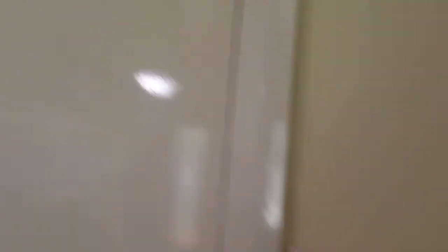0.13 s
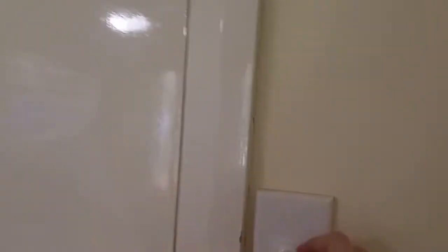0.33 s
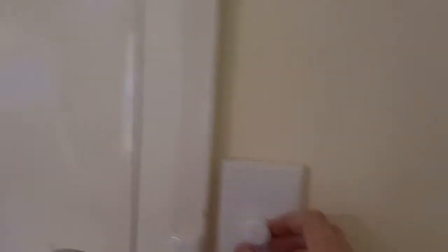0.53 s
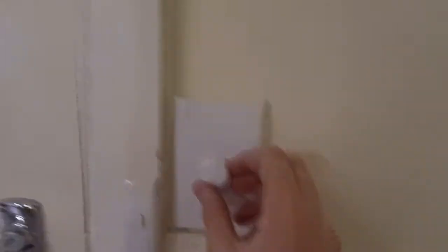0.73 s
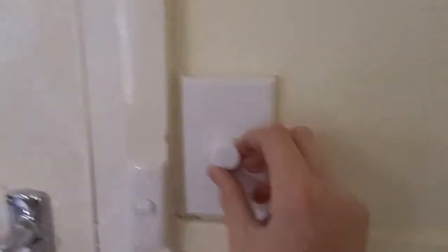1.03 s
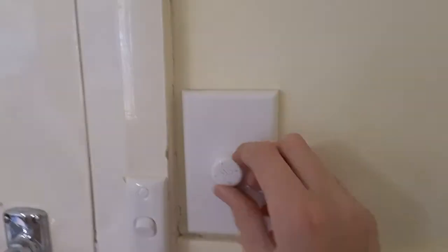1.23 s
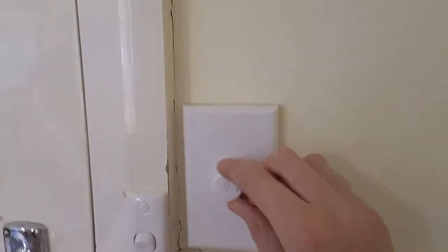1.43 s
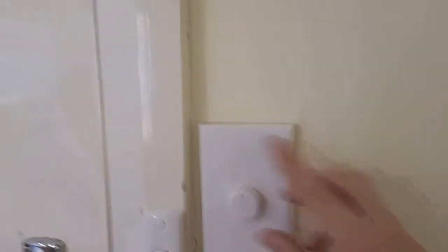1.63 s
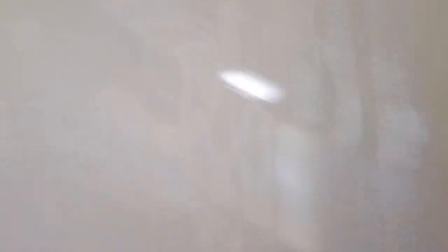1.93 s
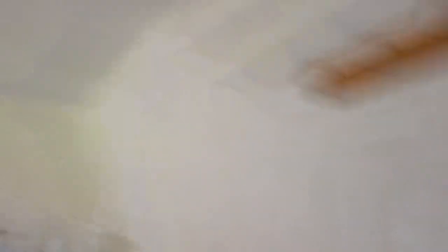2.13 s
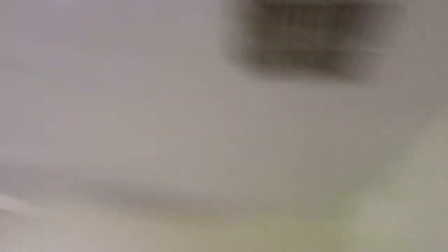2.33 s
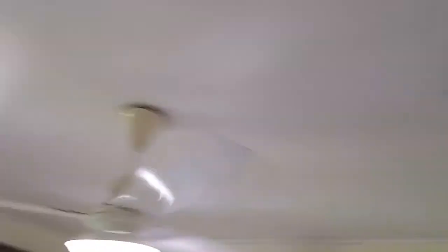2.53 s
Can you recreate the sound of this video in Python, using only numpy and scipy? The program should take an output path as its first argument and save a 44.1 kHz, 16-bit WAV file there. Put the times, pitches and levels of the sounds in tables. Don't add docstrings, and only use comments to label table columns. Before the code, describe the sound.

A rotary knob on a plastic wall plate snaps once, bright and hard, after tiny finger ticks. Short room echo follows, over soft hiss and a far low engine hum, picked up close by a handheld stereo microphone.

```python
import sys
import numpy as np
from scipy import signal
from scipy.fft import rfft, irfft
from scipy.io import wavfile
from scipy.ndimage import uniform_filter1d

SR = 44100
rng = np.random.default_rng(int(sys.argv[2]) if len(sys.argv) > 2 else 0)


def transcribe(u):
    v = np.clip(np.atleast_2d(u).T, -1, 1)
    q = np.round(v * 32767).astype(np.int16)
    wavfile.write(sys.argv[1], SR, q)


def how_loud(loudness_db):
    steps = np.asarray(loudness_db, float) / 20
    return 10 ** steps


N = 119070
T = np.arange(N) / SR
SNAP_S = 1.3975
LEFT_LAG_S = 0.0003
TOP_HZ = 15730


def evened(x):
    return x / np.sqrt(np.mean(x ** 2) + 1e-20)


def read(points, hz):
    f, value = np.transpose(points)
    return np.interp(np.log(hz + 1), np.log(f + 1), value)


def panned(pan_db):
    return how_loud(np.array([0.5 * pan_db, -0.5 * pan_db]))


def placed(level_db, pan_db):
    return how_loud(level_db) * panned(pan_db)[:, None]


def bump(centre, half_width):
    return np.exp(-0.5 * ((T - centre) / half_width) ** 2)


# (frequency [Hz], likeness [0 to 1])
LIKENESS = [(30, .6), (60, 0.8), (130, 0.7), (220, 0.2), (550, 0.1), (1650, 0.05), (5000, .02),
            (15000, 0.039)]


def noise(shape):
    hz = np.fft.rfftfreq(N, 1 / SR)
    a, b = rfft(rng.standard_normal((2, N)))
    alike = np.clip(read(LIKENESS, hz), -1, 1)
    right = alike * a + np.sqrt(1 - alike ** 2) * b
    edge = (hz > shape[0][0] * 0.5) * (hz < TOP_HZ)
    return evened(irfft(np.array([a, right]) * how_loud(read(shape, hz)) * edge, N))


def fuzzy(hz, width):
    r = np.exp(-np.pi * width / SR)
    z = rng.standard_normal(N) + 1j * rng.standard_normal(N)
    for _ in range(2):
        z = signal.lfilter([1 - r], [1, -r], z)
    return evened((z * np.exp(2j * np.pi * hz * T)).real)


def ring(start, hz, t60, phase=0.0):
    out, first = np.zeros(N), int(np.ceil(start * SR))
    t = T[first:first + int(2 * t60 * SR)] - start
    out[first:first + len(t)] = how_loud(-60 * t / t60) * np.sin(2 * np.pi * hz * t + phase)
    return out


# (time [s], pitch [Hz], level [dB], left-right difference [dB])
ENGINE_PATH = [(0.0, 110.9, -72.5, -16.5), (0.16, 108.2, -71, -2), (0.22, 106.5, -57, -3.5),
               (0.55, 109.4, -48, 1.5), (0.98, 107.9, -45, 0.5), (1.07, 106.3, -48, 1.5),
               (1.47, 107.2, -42.5, 0.5), (1.77, 108.7, -46.5, 1.5), (1.8, 108.4, -50, -1.0),
               (2.03, 108.6, -47, -2), (2.07, 107.2, -45.5, 5.5), (2.13, 106.7, -50, -4.5),
               (2.3, 109, -51, -5), (2.59, 107.8, -65.5, -23), (2.65, 106.7, -72.5, -22),
               (2.7, 105.6, -69.5, -37)]
# (pitch [Hz], width [Hz], level against the hum [dB])
ENGINE_TONES = [(80, 9, -24), (155.1, 4, -25), (51.6, 8.2, -34.5), (295.5, 15, -36.5), (328.8, 16, -38.5),
                (222.9, 24, -37)]
# (frequency [Hz], level [dB])
RUMBLE_SHAPE = [(28, -23), (42, -20.5), (55, -3.5), (130, -1.5), (200, 0.5), (330, -8), (600, -17.5),
                (1400, -41)]
# (frequency [Hz], level [dB])
ROAD_SHAPE = [(700, -9), (1200, -2.5), (2000, 4), (2600, -6), (3500, -28.5)]
# (centre [s], half width [s], level [dB])
TYRE_SWELLS = [
    (0.92, 0.17, -1),
    (1.85, 0.16, -4.5),
    (0.53, 0.027, -14),
    (.9, .04, -3),
    (.79, .02, -6),
]


def engine():
    s, hz, db, pan = np.transpose(ENGINE_PATH)
    level = np.interp(T, s, db)
    gains = panned(np.interp(T, s, pan))
    swell = level - db.max()

    turns = np.cumsum(np.interp(T, s, hz)) / SR
    turns = turns - np.interp(2.0705, T, turns)
    waver_db = 0.67 * fuzzy(0, 25.8)
    hum = -np.sqrt(2) * np.cos(2 * np.pi * turns) * how_loud(level + waver_db)

    tones = 0
    for f, width, below in ENGINE_TONES:
        steady = 1.38 * np.sin(2 * np.pi * f * T)
        tones = tones + how_loud(db.max() + below - 3.5) * (fuzzy(f, width) + steady)
    tones = tones * how_loud(0.66 * swell)

    rumble = noise(RUMBLE_SHAPE) * how_loud(-67.5 + 0.44 * swell)

    near = 0.74 * how_loud(0.51 * swell)
    near = near + sum(how_loud(d) * bump(centre, width) for centre, width, d in TYRE_SWELLS)
    grain_db = 2.5 * fuzzy(0, 59.8)
    road = noise(ROAD_SHAPE) * how_loud(-86.5 + grain_db) * near
    return hum * gains / gains.mean(0) + tones + rumble + road


# (frequency [Hz], level [dB per Hz])
HISS_SHAPE = [(180, -40.5), (300, -7), (600, -15), (1900, -16), (3200, -20), (5900, -25), (7000, -19.5),
              (15800, -18)]


def microphone():
    return how_loud(-78) * noise(HISS_SHAPE)


# (time [s], level [dB], pitch [Hz], left-right difference [dB])
JOLTS = [
    (0.0123, -58, 89, -7),
    (2.0705, -42, 105, 15.5),
    (2.0660, -58.5, 220, 16.5),
    (2.6, -60, 75, 0),
    (.118, -67, 72, 2),
    (2.625, -68, 70, 0),
    (.038, -61.5, 65, -1),
    (.080, -64.5, 68, -3),
    (.152, -64, 83, 3),
]


def camera():
    out = 0
    for s, db, hz, pan in JOLTS:
        pulse = np.exp(-0.5 * ((T - s) * hz / 0.55) ** 2)
        out = out - placed(db, pan) * pulse * np.cos(2 * np.pi * hz * (T - s))
    return out


# (time [s], level
# [dB], pitch [Hz], left-right difference [dB], length of ring [cycles])
SMALL_TICKS = [(.5102, -64, 1894, 0, 7.7), (0.5489, -69, 1800, -1, 7.7), (.698, -68, 1150, -4, 8),
               (.706, -67, 620, 0, 8), (.7633, -63, 1988, 5, 10), (0.7637, -62, 8200, -1, 14),
               (.7643, -68, 4460, 3, 24), (.7636, -64, 11500, 3, 9), (0.763, -64, 850, -1, 7),
               (0.7637, -66, 1280, 1, 7), (0.7635, -74, 3100, 2, 7), (1.2792, -62, 1250, 6, 6),
               (1.2980, -66, 2900, 2, 14), (1.3055, -62, 1700, 0, 10), (1.2725, -64, 2550, 7, 9),
               (1.2755, -61, 2600, 0, 14), (1.2768, -68, 7720, -2, 60), (1.2794, -52, 2500, 11, 8),
               (1.2812, -63, 7400, -2, 30), (1.2817, -58, 1700, 1, 14), (1.2808, -62, 3500, 0, 12),
               (1.2805, -69, 4900, -5, 35), (1.2813, -71, 6650, 0, 36), (1.2842, -60, 1400, 0, 10),
               (1.286, -62, 2400, -2, 12), (1.2915, -64, 1700, 0, 10), (1.3910, -55, 3000, 4, 18),
               (1.5450, -60, 2270, 3, 11), (1.5466, -62, 1600, 0, 9), (1.5470, -64, 706, -14, 7.7),
               (2.2848, -68, 4100, 11, 12), (2.2848, -66, 1981, 12, 10), (2.2845, -68, 6600, 10, 20),
               (2.2670, -70, 1900, 6, 12), (2.2995, -70, 2000, 6, 12), (2.3110, -69, 1950, 6, 16),
               (.7642, -66, 13900, 3, 40), (1.2752, -65, 3800, 0, 10), (1.3985, -54, 1370, 2, 18),
               (2.285, -71, 2900, 8, 9)]


def small_ticks():
    out = 0
    for s, db, hz, pan, cycles in SMALL_TICKS:
        rise = 1 - np.exp(-np.clip(T - s, 0, None) * hz / 0.68)
        out = out + placed(db + 5.5, pan) * ring(s, hz, cycles / hz) * rise
    return out


# (frequency [Hz], time to fall 60 dB [s])
ECHO_TIME = [(400, 0.37), (1000, 0.23), (2000, 0.27), (3500, 0.23), (6000, 0.29), (8500, 0.23),
             (15000, 0.3)]
# (frequency [Hz], level [dB])
ECHO_COLOUR = [(300, -10.5), (700, 4.5), (2000, -3), (4200, 1.5), (5800, -4), (7500, -4.5), (9600, -2),
               (15500, -10.5)]


def room(x):
    n, gap_s, build_s = SR // 2, 0.004, 0.0068
    taps = rng.choice([-1.0, 1.0], (2, n)) * (rng.random((2, n)) < 0.3) * (T[:n] > gap_s)
    hz, t, z = signal.stft(taps, SR, nperseg=128)
    z = z * (1 - 0.57 * np.exp(-t / build_s)) * (hz < TOP_HZ)[:, None]
    fade_db = read(ECHO_COLOUR, hz)[:, None] - 60 * t / read(ECHO_TIME, hz)[:, None]
    tail = signal.istft(z * how_loud(fade_db), SR, nperseg=128)[1]
    return signal.fftconvolve(x[None], tail / np.linalg.norm(tail[0]), axes=1)[:, :N]


# (start [s], level [dB], pitch [Hz], left-right difference [dB], swell time [s])
SWITCH_PARTS = [(1.39709, -44.5, 13960.0, -10, 0.00027), (1.39723, -35.7, 3490.0, 1, 0.00045),
                (1.39737, -38.9, 10840.0, -2, 0.00018), (1.39738, -40.3, 6470.0, 3, 0.00097),
                (1.3974, -43.7, 15430.0, 3, 0.00025), (1.39744, -51.5, 1420.0, 2, 0.0015),
                (1.39748, -37.9, 13350.0, 11, 0.00012), (1.3975, -38.2, 7420.0, -16, 0.00027),
                (1.39762, -38.2, 4570.0, 11, 0.00019), (1.39832, -31.3, 8250.0, 7, 0.00027),
                (1.39833, -40.8, 5090.0, -13, 0.0004), (1.39858, -36.5, 4500.0, -9, 0.00042),
                (1.39871, -43.4, 10130.0, -5, 0.0007), (1.39872, -32.9, 7210.0, -14, 0.00029),
                (1.39875, -44.6, 2490.0, 12, 0.00025), (1.39894, -46.0, 13890.0, -14, 0.00017),
                (1.39911, -47.7, 11470.0, 3, 0.00047), (1.39921, -33.8, 7760.0, 10, 0.00025),
                (1.39954, -39.2, 4730.0, 8, 0.00028), (1.40033, -50.1, 13240.0, 5, 0.00023),
                (1.40047, -37.9, 7760.0, -1, 0.00026), (1.40083, -42.4, 4270.0, 4, 0.00024),
                (1.40099, -50.4, 9630.0, 10, 0.0003), (1.40181, -39.9, 7110.0, -7, 0.00024),
                (1.40199, -45.3, 13560.0, -6, 0.00029), (1.40208, -45.1, 3250.0, -3, 0.00031),
                (1.40227, -40.8, 9130.0, 2, 0.00023), (1.40228, -42.3, 6120.0, -9, 0.00035),
                (1.40232, -48.2, 14190.0, -1, 0.00047), (1.40249, -52.8, 2370.0, 12, 0.00113),
                (1.40277, -44.6, 7970.0, -8, 0.00049), (1.403, -53.6, 10950.0, -9, 0.00034),
                (1.40332, -43.7, 5380.0, 5, 0.00022), (1.40351, -48.1, 4340.0, -2, 0.00023),
                (1.40365, -45.1, 8980.0, 7, 0.00036), (1.40434, -49.1, 8060.0, -1, 0.00091),
                (1.40544, -47.2, 7050.0, -6, 0.00021)]


def parts():
    out = np.zeros((2, N))
    first = int(SWITCH_PARTS[0][0] * SR) - SR // 100
    span = slice(first, first + SR // 20)
    lag = np.array([[LEFT_LAG_S], [0]])
    for s, db, hz, pan, swell in SWITCH_PARTS:
        t = np.clip(T[span] - s - lag, 0, None)
        shape = t / swell * np.exp(1 - t / swell)
        out[:, span] += placed(db, pan) * shape * np.sin(2 * np.pi * hz * t)
    return how_loud(1.2) * out


SPRING_PITCHES = (8460, 8600)


def crack():
    click = np.arange(N) == int(SNAP_S * SR)
    spring = sum(ring(SNAP_S, hz, 0.013, np.pi / 2) for hz in SPRING_PITCHES)
    return how_loud(-20.5) * click + how_loud(-46.5) * spring


# (pitch [Hz], level [dB], time to fall 60 dB [s])
WALL_TONES = [(668, -48, 0.11), (838, -52, 0.085), (577, -55, 0.082), (1020, -57, .05), (1360, -56, 0.05),
              (1605, -55, 0.06), (440, -55, 0.097)]


def wall():
    rise_s = 0.015
    rise = 1 - np.exp(-(np.clip(T - SNAP_S, 0, None) / rise_s) ** 2)
    return rise * sum(how_loud(db) * ring(SNAP_S, hz, t60) for hz, db, t60 in WALL_TONES)


# (centre [s], half width [s], level [dB], left-right difference [dB])
SLEEVE_RUBS = [(2.2890, 0.011, -80, 6), (2.2900, 0.04, -79, 13.5), (2.6250, 0.034, -79, 2),
               (2.2462, .0013, -76, 5), (2.2610, 0.001, -74, 3), (2.2680, 0.0011, -71, 6),
               (2.272, .001, -75, 6), (2.283, 0.00091, -72, 8), (2.2935, 0.00091, -70.5, 6),
               (2.297, .001, -78, 6), (2.309, .001, -79, 4)]
# (frequency [Hz], level [dB])
CLOTH_SHAPE = [(1500, -25), (5000, -14.5), (7500, -1), (10000, -2), (15000, -3)]


def sleeve():
    crackles_per_s = 580
    grains = rng.exponential(1, N) * (rng.random(N) < crackles_per_s / SR)
    grains = evened(uniform_filter1d(grains, size=60))
    cloth = evened(noise(CLOTH_SHAPE) * (1 + how_loud(-7.5) * grains))
    return cloth * sum(placed(db, pan) * bump(s, width) for s, width, db, pan in SLEEVE_RUBS)


def scene():
    ticks, thud = small_ticks(), wall()
    dulled = uniform_filter1d(ticks[0], size=5)
    echoes = room(crack() + how_loud(-14.5) * thud + how_loud(-4.5) * dulled)
    wide_thud = np.array([np.roll(thud, round(LEFT_LAG_S * SR)), thud])
    switch = parts() + wide_thud + ticks + echoes
    return engine() + microphone() + camera() + switch + sleeve()


def top_cut(x):
    return signal.sosfilt(signal.butter(12, 16640, fs=SR, output="sos"), x)


def record(dry):
    edge = signal.firwin(255, 16500, fs=SR)
    mix = signal.oaconvolve(dry, edge[None], "same")
    return top_cut(mix)


dry = scene()
out = record(dry)
transcribe(out)
```